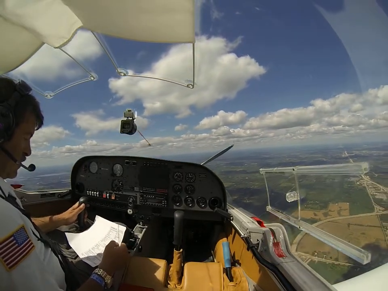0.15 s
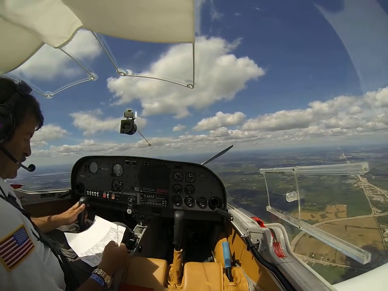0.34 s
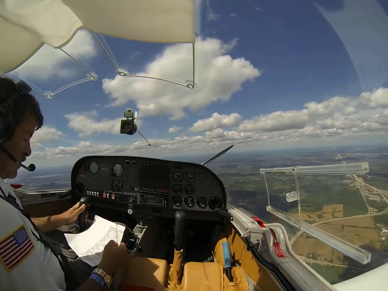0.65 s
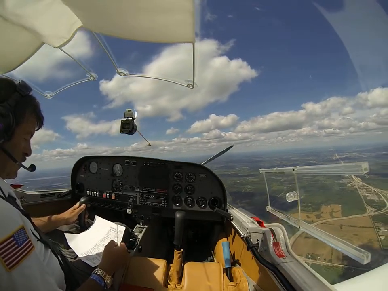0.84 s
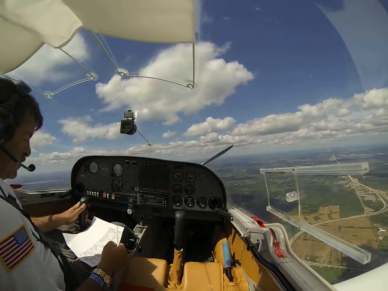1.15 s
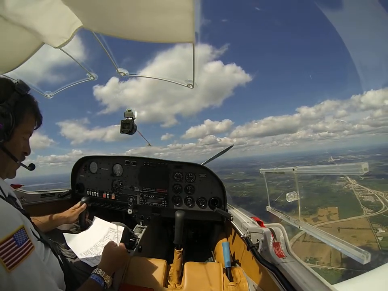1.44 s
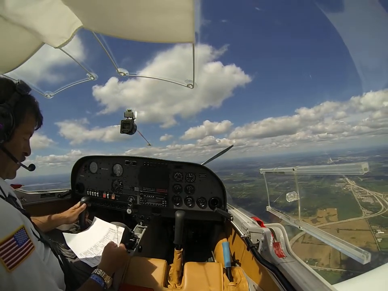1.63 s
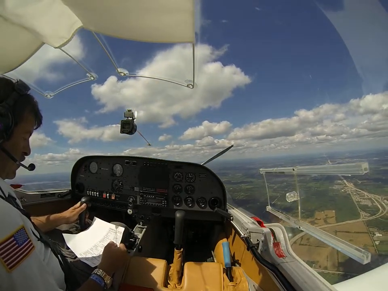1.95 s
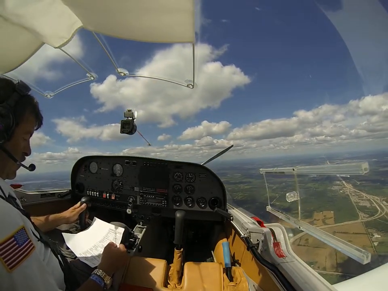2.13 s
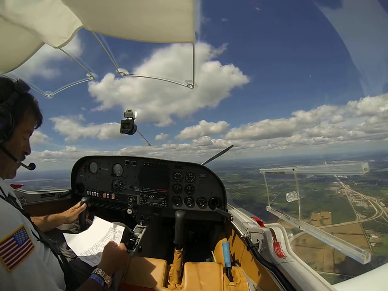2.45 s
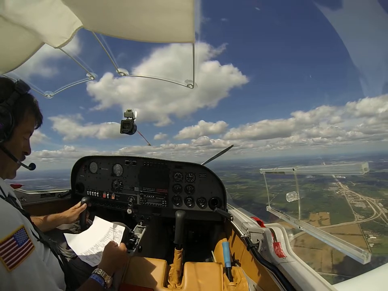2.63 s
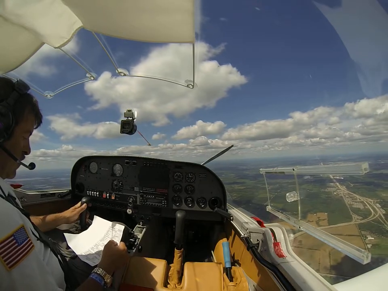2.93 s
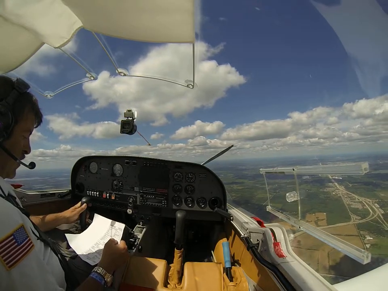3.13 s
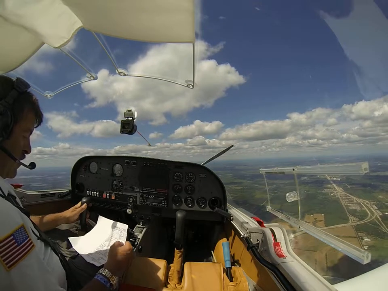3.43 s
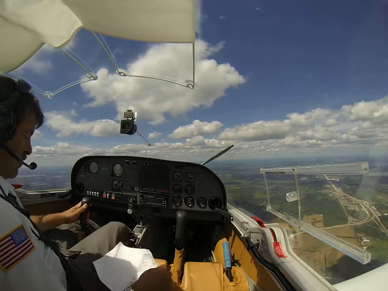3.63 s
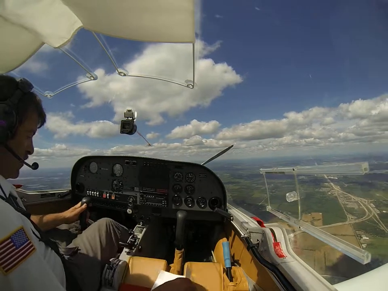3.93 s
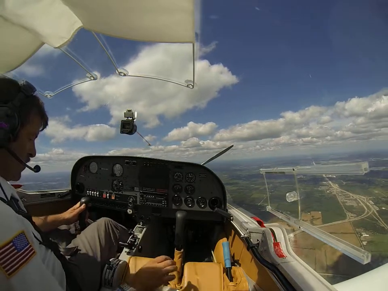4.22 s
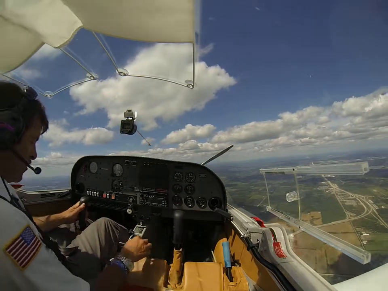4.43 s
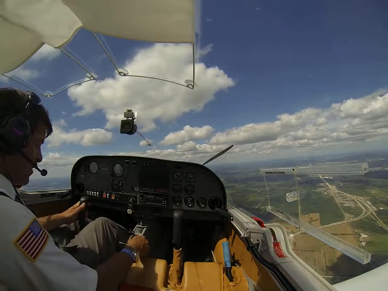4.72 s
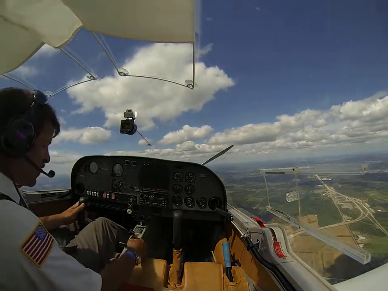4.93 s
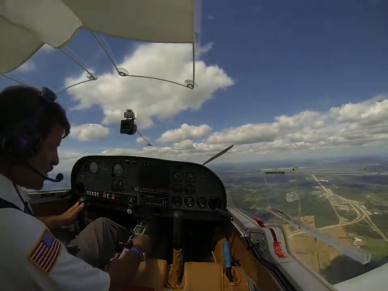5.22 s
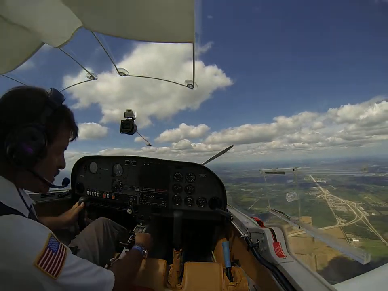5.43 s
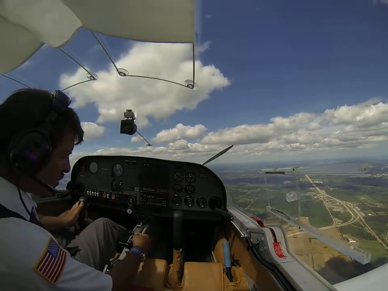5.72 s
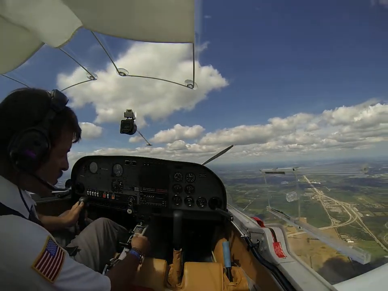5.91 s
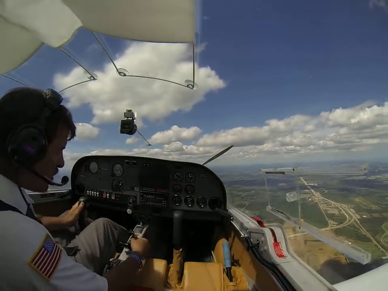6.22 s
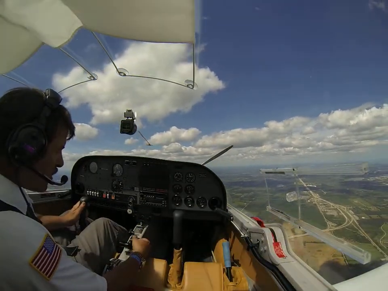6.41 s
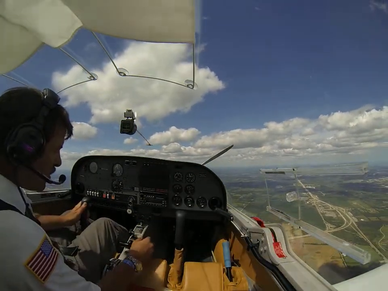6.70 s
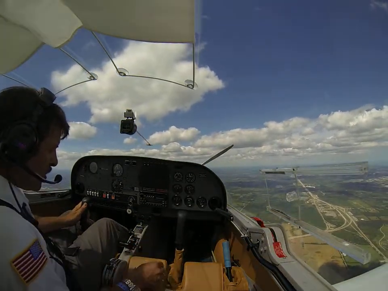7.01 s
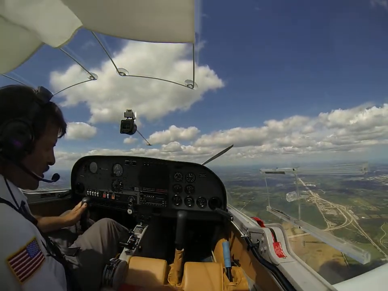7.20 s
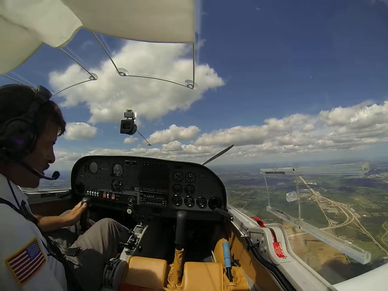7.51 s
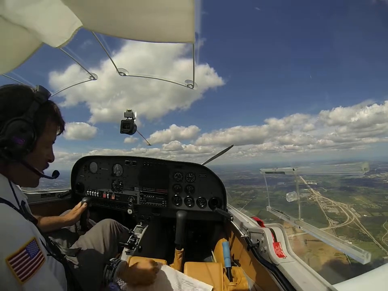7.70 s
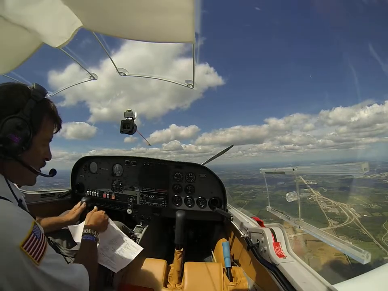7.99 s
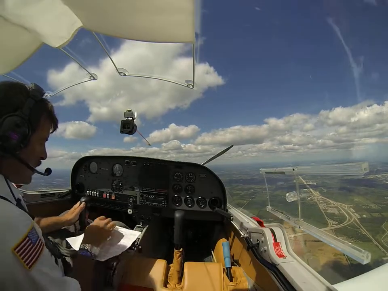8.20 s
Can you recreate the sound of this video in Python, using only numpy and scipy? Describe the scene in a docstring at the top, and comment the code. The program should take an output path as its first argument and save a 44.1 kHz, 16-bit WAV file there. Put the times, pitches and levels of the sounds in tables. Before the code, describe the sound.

A deep, fluttering drone of wind fills a small gliding plane's cabin throughout, heard boxy and close through an enclosed microphone. Air hisses softly over the canopy, with barely audible spells of high whistling. A few short, quiet paper rustles come midway and near the end, the clearest at about seven seconds. A thin hum appears late, and the airflow eases slightly.

```python
"""Air rushes over the canopy of a small aircraft gliding with its engine off, heard by a cased camera
in the cockpit. From the start, turbulence drums the cabin's low modes, the slipstream hisses through
the shell, a canopy gap whistles in spells and the camera's sensor read-out leaks a thin buzz.
Paper rustles faintly at 1.7 s and again around 4 s. After 5.4 s a thin hum swells, slowly sinking in
pitch; the firmest rustle comes near 7.2 s, and the airflow eases at the end."""
import sys
import numpy as np
from scipy import signal
from scipy.fft import rfft, irfft, next_fast_len
from scipy.io import wavfile
from scipy.ndimage import uniform_filter1d, map_coordinates

SR = 44100
rng = np.random.default_rng(int(sys.argv[2]) if len(sys.argv) > 2 else 0)


def unload_audio(sound):
    """Save the sound as a 16-bit wav file, at the path given as the first command line argument."""
    columns = np.transpose(np.atleast_2d(sound))
    # keep every value between -1 and 1, then stretch to whole-number steps
    steps = np.round(np.clip(columns, -1, 1) * 32767)
    wavfile.write(sys.argv[1], SR, steps.astype(np.int16))


N = 368235

# Upper resonances of the camera case. Each row: centre in Hz, width in Hz, relative level in dB.
CASE_MODES = [(2240, 66, 1.5), (2337, 86, 0.5), (2600, 270, -10), (2970, 250, -11.5), (3130, 85, -4),
              (3285, 250, -10), (3700, 540, -17), (4010, 180, -20.5), (4790, 200, -16.5),
              (5060, 150, -16.5), (5250, 150, -14.5), (6000, 820, -20), (6730, 1000, -18.5),
              (7670, 250, -22), (8250, 600, -27), (9150, 600, -30), (9500, 250, -28.5)]


def cabin():
    """Forced vibration: turbulent buffeting drives four families of low modes, whose levels fluctuate."""
    # Resonances. Each row: centre in Hz, width in Hz, relative level in dB.
    airframe_modes = [(22.9, 7.2, 1), (47.5, 9, -15.5)]
    lengthwise_modes = [(76, 7, 1), (78.4, 4.6, -5), (90.1, 6.7, -0.5)]
    crosswise_modes = [(113.7, 16, -11), (134.3, 13.2, -3.5), (147.3, 14, -6.5), (159.8, 21.8, 0),
                       (186.7, 13.2, -6)]
    panel_modes = [(222.5, 22, -0.5), (241.5, 24, -5), (277, 22, -5.5), (305.2, 14.8, -0.5),
                   (321.3, 46, -3.5), (371.2, 43.5, -4.5), (402.3, 18, -8.5), (428.6, 39, -9.5),
                   (466, 33, -16.5), (557, 56, -19)]
    # Buffeting of the cabin. Each row: time in seconds, boom level in dB, thrum level in dB.
    buffeting = [(0, -27.5, -36), (.4, -24, -37), (.67, -29, -31), (.9, -21.5, -35), (1.25, -28.5, -39.5),
                 (1.4, -27.5, -34), (1.7, -26, -36.5), (2.15, -27, -40), (2.32, -25, -33), (2.5, -24, -41),
                 (2.65, -27.5, -29.5), (3.05, -28.5, -44), (3.25, -35, -38), (3.45, -30, -34),
                 (3.8, -31.5, -40), (4.2, -30, -36.5), (4.37, -30, -31.5), (4.63, -28, -43),
                 (5.12, -30.5, -36), (5.6, -26.5, -36.5), (5.8, -32, -40), (6.28, -27.5, -35.5),
                 (6.65, -30.5, -38.5), (7.0, -28, -45), (7.1, -28.5, -36), (7.45, -30.5, -33),
                 (7.63, -26, -34), (7.75, -32, -35.5), (8.05, -29, -35), (8.15, -26.5, -47),
                 (8.35, -32, -37)]
    # Roar of the canopy and side panels. Each row: time in seconds, level in dB.
    roar_levels = [(0.0, -24), (0.09, -38), (0.14, -37), (0.39, -34), (0.49, -35.5), (0.6, -32.5),
                   (0.65, -36.5), (0.79, -33.5), (1.02, -37.5), (1.09, -29.5), (1.14, -34), (2.67, -34),
                   (3.74, -37), (4.53, -34.5), (6.0, -38.5), (6.44, -35.5), (8.33, -35.5), (8.35, -38)]
    boom_db, thrum_db = curves(buffeting)
    roar_db, = curves(roar_levels)

    shake_db = -38 + 3.5 * wobble(per_second=7)
    shake = turbulence(modes(airframe_modes, 1.5))
    shake = unit(steadied(shake, share=0.5, seconds=0.28))

    thrum = turbulence(modes(lengthwise_modes, 0.92))
    thrum = steadied(thrum, share=0.68, seconds=0.15)
    thrum = unit(filtered(thrum, modes(lengthwise_modes, 0.63)))

    boom_db += 1.5 * wobble(per_second=14)
    boom = turbulence(modes(crosswise_modes, 1.66))
    boom = steadied(boom, share=0.22, seconds=0.032)
    boom = unit(steadied(boom, share=0.45, seconds=0.2))

    roar = turbulence(modes(panel_modes, 1.504), patchy_db=0.88)
    return amp(shake_db) * shake + amp(thrum_db) * thrum + amp(boom_db) * boom + amp(roar_db) * roar


def slipstream():
    """Boundary-layer noise excites the shell and the camera case, growing louder with the airflow."""
    # Strength of the airflow. Each row: time in seconds, level offset in dB.
    airflow = [(0, 0.7), (1, 0.7), (2, .5), (2.7, .5), (3.1, -1), (3.8, -0.5), (5.2, -0.1), (6, -0.3),
               (7.5, 0), (8.35, -1.2)]
    # Mid resonances of the shell. Each row: centre in Hz, width in Hz, relative level in dB.
    shell_modes = [(790, 240, -12.5), (947, 65, -5.5), (1328, 220, -8.5), (1482, 75, .5), (1580, 56, -8),
                   (1664, 88, -5), (1660, 22, -6.5), (1740, 120, -10), (1882, 170, -12)]
    # Broad hiss of the air. Each row: frequency in Hz, relative spectral level in dB.
    air_spectrum = [(1500, -20.5), (3500, -4.5), (7000, -7.5), (10000, -13.5), (12000, -12.5), (15000, -20)]
    flow_db, = curves(airflow)
    rush = amp(-50 + flow_db) * turbulence(modes(shell_modes, 1.21), patchy_db=0.8)
    air = turbulence(slope(air_spectrum), patchy_db=1.2)
    hiss = turbulence(modes(CASE_MODES, 1.0), patchy_db=0.63) + amp(-15) * air
    hiss_db = -58 + 0.74 * flow_db + 0.18 * wobble(14)
    return rush + amp(hiss_db) * hiss


def paper():
    """Impulsive excitation: each crumple is a decaying puff of noise that sets the camera case ringing."""
    # Each row: start in seconds, level in dB, rise time in seconds, time to fall 60 dB in seconds,
    # level of the ring relative to the crackle in dB.
    crumples = [(1.7, -68, .002, 0.087, -20), (3.75, -71, .25, 1.6, -20), (4.06, -66, .002, .08, -15),
                (4.311, -52.5, .002, 0.16, -10), (7.188, -46.5, 0.008, 0.14, -10.5),
                (7.2, -53.5, .03, 0.11, 13), (7.41, -56, .002, 0.17, -8), (8.18, -58, .002, .1, -11)]
    # Crackle of the paper. Each row: frequency in Hz, relative spectral level in dB.
    paper_spectrum = [(1600, -31), (2150, -1.5), (2700, -2.5), (3400, 2), (4500, 4), (6000, -0.5),
                      (8000, -5), (12000, -24.5)]
    # Case modes set off by a touch. Each row: centre in Hz, width in Hz, relative level in dB.
    ring_modes = [(3240, 140, -1), (2320, 100, -5)]
    t = np.arange(N) / SR
    crackle_envelope, ring_envelope = np.zeros(N), np.zeros(N)
    for start, db, rise, t60, ring_db in crumples:
        age = np.clip(t - start, 0, None)
        puff = amp(db - 60 * age / t60) * (1 - np.exp(-age / rise))
        crackle_envelope += puff
        ring_envelope += amp(ring_db) * puff
    grain = amp(1.5 * wobble(300))
    crackle = grain * turbulence(lambda hz: slope(paper_spectrum)(hz) * modes(CASE_MODES, 1.4)(hz))
    ring = steadied(turbulence(modes(ring_modes, 0.77)), share=0.95, seconds=0.006)
    return crackle_envelope * unit(crackle) + ring_envelope * unit(ring)


def whistle():
    """Flow through a canopy gap sounds edge tones, each gliding under a bell-shaped envelope."""
    # Each row: middle in seconds, length in seconds, start pitch in Hz, end pitch in Hz, top level in dB.
    spells = [(0.1, .3, 6940, 6940, -76), (0.45, 0.46, 6790, 6790, -74), (0.55, .3, 6940, 6930, -80),
              (1.048, .4, 6800, 6800, -73), (1.13, 0.18, 6950, 6940, -70), (1.702, 0.51, 6900, 6950, -73),
              (1.6, .4, 6820, 6810, -80), (2.12, .15, 6950, 6950, -70), (2.1, .15, 6800, 6810, -74),
              (2.6, 0.38, 6790, 6790, -77), (2.92, 0.064, 6790, 6780, -70), (3.52, 0.11, 6700, 6780, -75),
              (4.02, .2, 6600, 6740, -72), (4.25, .15, 6960, 7000, -75), (4.37, .15, 6800, 6810, -74),
              (4.65, .15, 7050, 7050, -80), (5.15, .25, 6750, 6760, -73), (5.45, .2, 6850, 6870, -76),
              (5.5, .3, 6590, 6590, -78), (6.0, 0.34, 6570, 6630, -74), (6.43, .12, 6820, 7000, -75),
              (6.654, .16, 6970, 7100, -71), (7.08, 0.22, 6800, 6750, -74), (7.165, .035, 6780, 6750, -69),
              (8.15, .3, 6670, 6560, -75)]
    song = np.zeros(N)
    for middle, length, start_hz, end_hz, db in spells:
        first = max(0, round((middle - 2 * length) * SR))
        last = min(N, round((middle + 2 * length) * SR))
        offset = (np.arange(first, last) / SR - middle) / length
        hz = np.interp(offset, [-0.5, 0.5], [start_hz, end_hz])
        song[first:last] += np.exp(-2 * offset ** 2) * edge_tone(hz, db)
    return song


def edge_tone(hz, db):
    """A jet oscillating across an edge gives a narrow noise band in spurts, with a wider airy fringe."""
    n, fringe_above_hz = len(hz), 220
    phase = 2 * np.pi * np.cumsum(hz) / SR
    fringe_phase = phase + 2 * np.pi * fringe_above_hz * np.arange(n) / SR
    core = wobble(95, n) * np.sin(phase) + wobble(95, n) * np.cos(phase)
    fringe = wobble(800, n) * np.sin(fringe_phase) + wobble(800, n) * np.cos(fringe_phase)
    spurts = amp(1.4 * wobble(25, n))
    return amp(db) * unit(spurts * core + amp(-3.5) * fringe)


def hum():
    """Slight random modulation of amplitude and frequency makes a faint pure tone waver."""
    # Course of the hum. Each row: time in seconds, pitch in Hz, rms level in dB.
    course = [(5.4, 910, -87), (6.3, 906, -75), (7.0, 900, -73), (7.3, 910, -64.5), (8.1, 891, -66),
              (8.35, 860, -80)]
    hz, db = curves(course)
    amplitude = np.sqrt(2) * amp(db + 2 * wobble(6))
    phase = 2 * np.pi * np.cumsum(hz + 3 * wobble(8)) / SR
    return amplitude * np.sin(phase)


def sensor_buzz():
    """Electrical crosstalk: the sensor's row rate and its octave leak in, one read-out burst a frame."""
    frame_hz, row_hz = 47.9712, 6446
    first_burst_s, burst_s = 0.0059, 0.0081
    t = np.arange(N) / SR - first_burst_s
    frame = np.floor(t * frame_hz).astype(int)
    age = t - frame / frame_hz
    jitter = (0.35 + 0.045 * t) * rng.standard_normal(frame.max() + 2)[frame]
    lag_rows = frame % 2 * (0.14 + 0.017 * t)  # every other frame lags, more so as time goes on
    phase = 2 * np.pi * (row_hz * age - lag_rows) + jitter
    return (age < burst_s) * (amp(-69) * np.sin(phase) + amp(-75) * np.sin(2 * phase))


def turbulence(gain, patchy_db=0):
    """Eddies give random pressure: shaped noise of rms 1, optionally patchy in time and frequency."""
    noise = rng.standard_normal(N)
    if patchy_db:
        spectra = signal.stft(noise, nperseg=512)[2]
        patches = uniform_filter1d(rng.standard_normal(spectra.shape), size=6, axis=0)
        patches = unit(uniform_filter1d(patches, size=12, axis=1))
        noise = signal.istft(spectra * amp(patchy_db * patches), nperseg=512)[1][:N]
    return unit(filtered(noise, gain))


def modes(table, steepness):
    """Incoherent addition: the gain of resonances driven by unrelated eddies, whose powers add."""
    return lambda hz: np.sqrt(sum(amp(db) ** 2 / (1 + (2 * (hz - centre) / width) ** 2) ** steepness
                                  for centre, width, db in table))


def steadied(x, share, seconds):
    """Envelope compression: dividing out a share of the slow swelling makes a noise band beat less."""
    level = np.sqrt(np.abs(uniform_filter1d(x ** 2, int(seconds * SR))) + 0.02)
    return x / level ** share


def filtered(x, gain):
    """Linear filtering: the spectrum of x is multiplied by gain(hz)."""
    size = next_fast_len(N + 8192)
    return irfft(rfft(x, size) * gain(np.fft.rfftfreq(size, 1 / SR)), size)[..., :N]


def slope(points):
    """Frequency response through (Hz, dB) points on a logarithmic axis."""
    knots_hz, db = np.transpose(points)
    return lambda hz: amp(np.interp(np.log(hz + 1), np.log(knots_hz), db))


def wobble(per_second, size=N):
    """Smooth fluctuation: a spline through evenly spaced random knots."""
    knots = rng.standard_normal(int(size * per_second / SR) + 4)
    return map_coordinates(knots, [np.arange(size) * per_second / SR])


def curves(rows):
    """Linear interpolation: one value per sample for each column after the time."""
    times, *columns = np.transpose(rows)
    return [np.interp(np.arange(N) / SR, times, column) for column in columns]


def amp(db):
    """Amplitude ratio of a level in decibels."""
    return 10 ** (np.asarray(db) / 20)


def unit(x):
    """Normalisation to an rms of 1."""
    return x / np.sqrt(np.mean(x ** 2) + 1e-20)


def scene():
    """Superposition: the pressures of the sources add in one channel."""
    return (cabin() + slipstream() + whistle() + hum() + paper())[None]


def record(dry):
    """Band limiting: the buzz joins in the wiring, then the input blocks the deepest bass and top treble."""
    # Treble roll-off of the input. Each row: frequency in Hz, gain in dB.
    roll_off = [(13500, 0), (14000, -1.5), (14400, -4), (15000, -4)]
    bass_hz, top_hz = 12, 15000
    return filtered(dry + sensor_buzz(),
                    lambda hz: (hz < top_hz) * slope(roll_off)(hz) * hz ** 2 / (hz ** 2 + bass_hz ** 2))


dry = scene()
out = record(dry)
unload_audio(out)
```